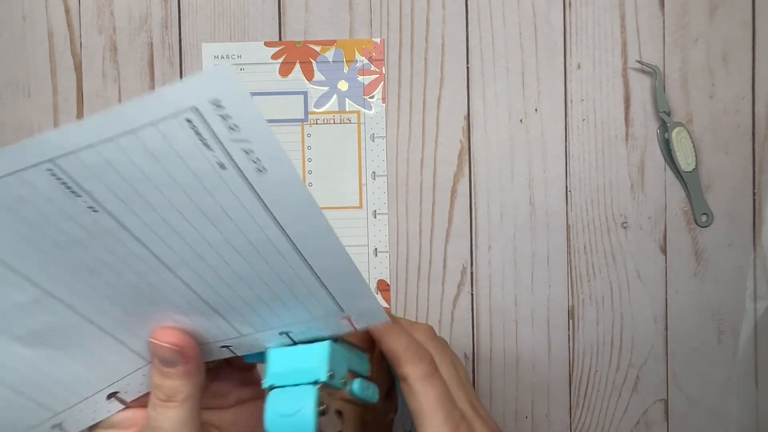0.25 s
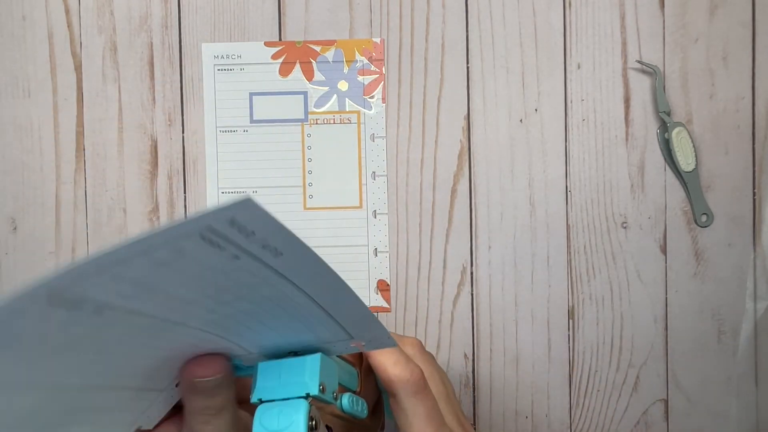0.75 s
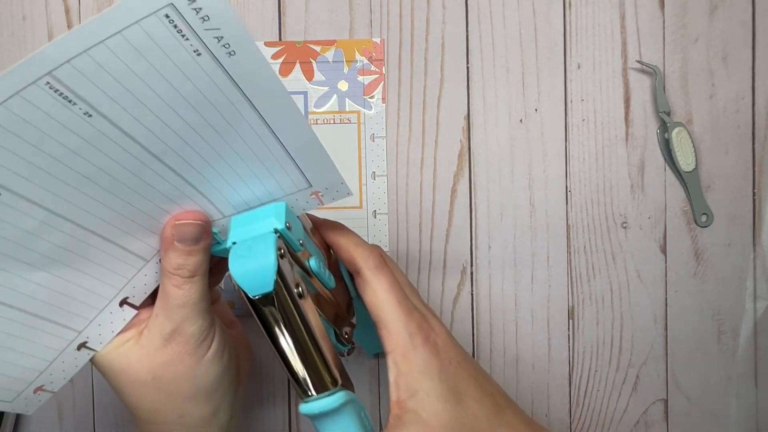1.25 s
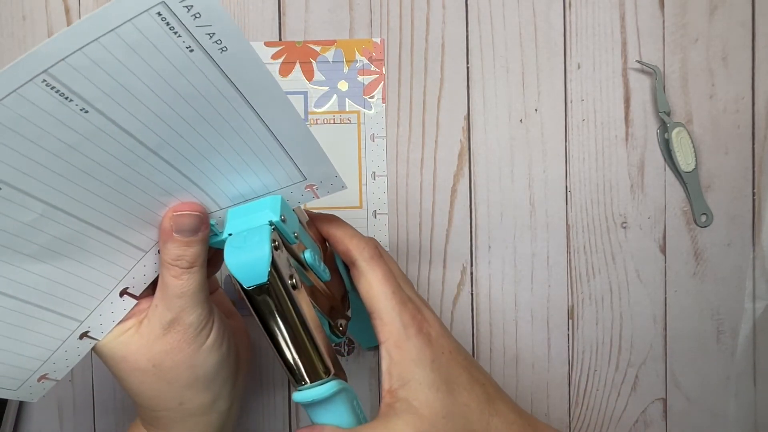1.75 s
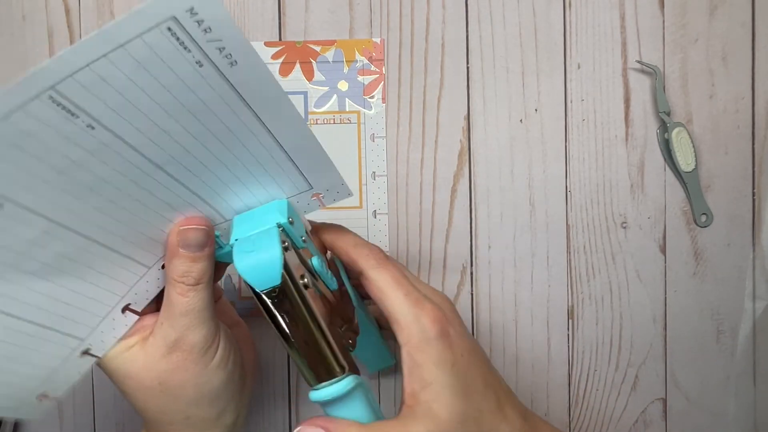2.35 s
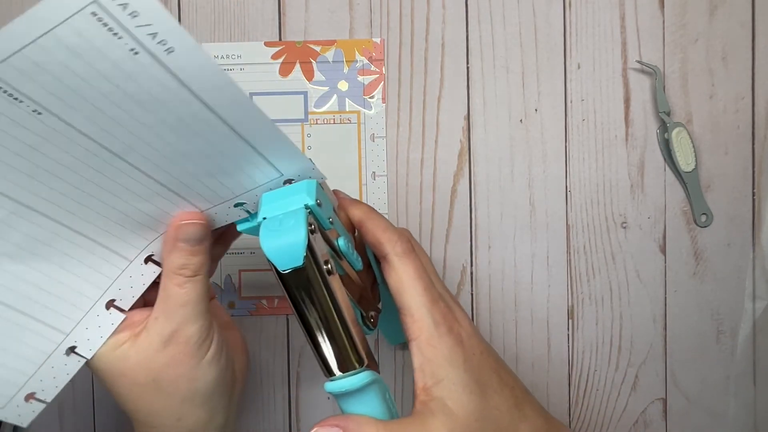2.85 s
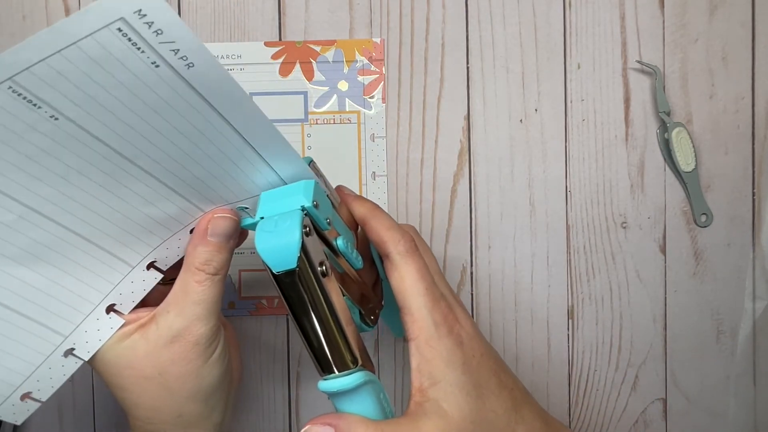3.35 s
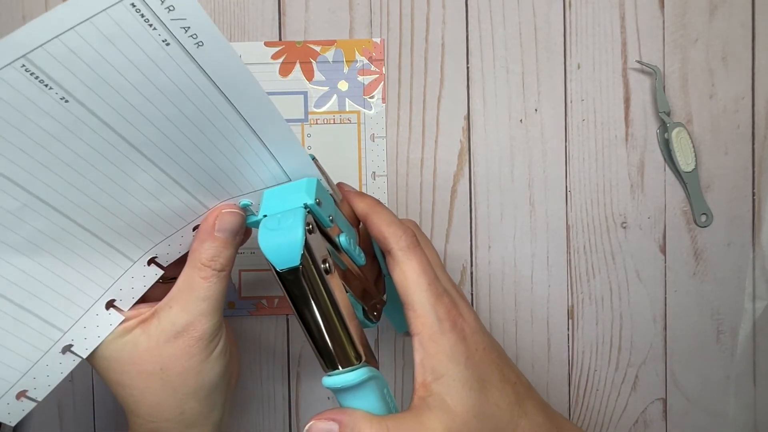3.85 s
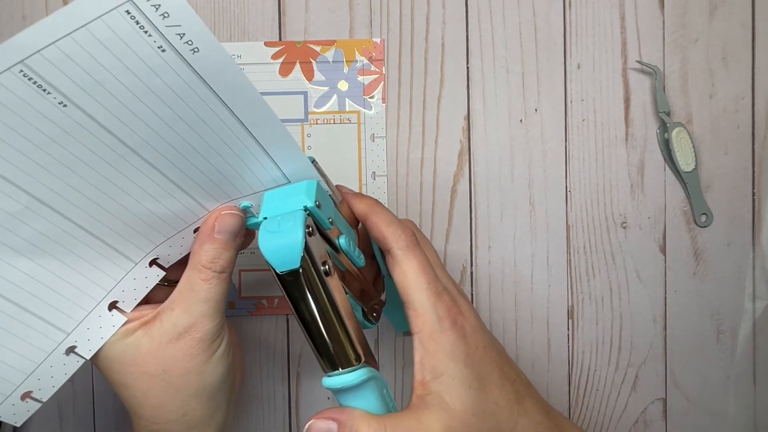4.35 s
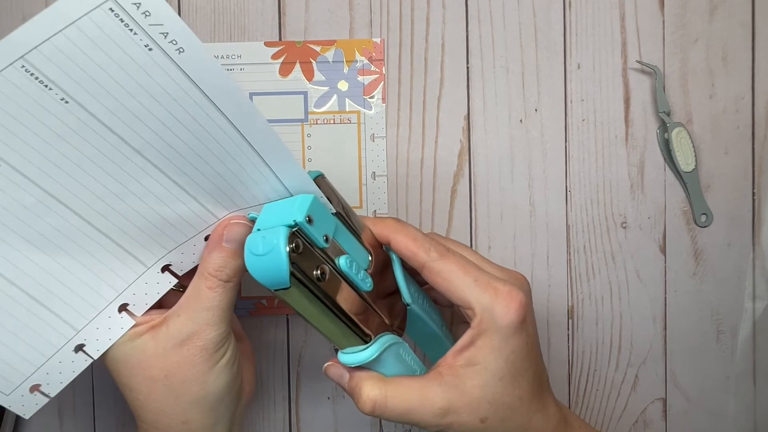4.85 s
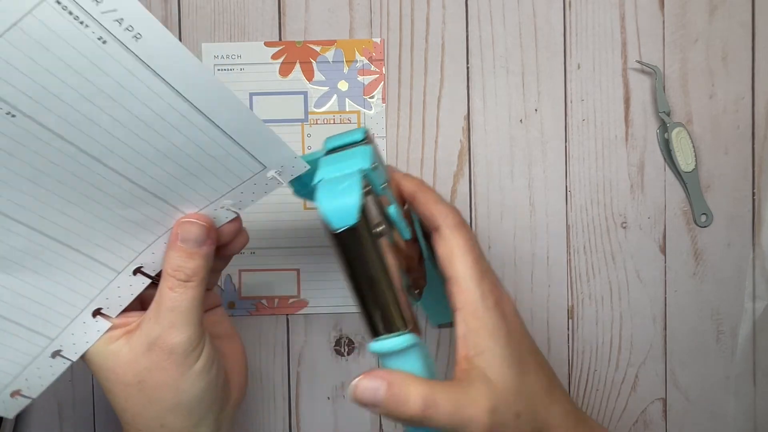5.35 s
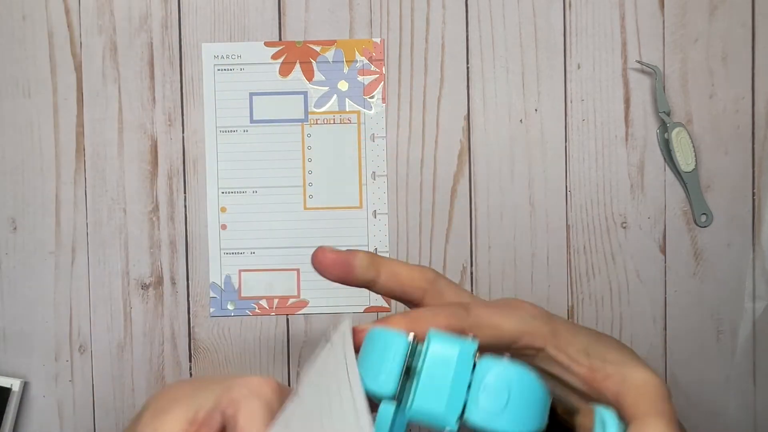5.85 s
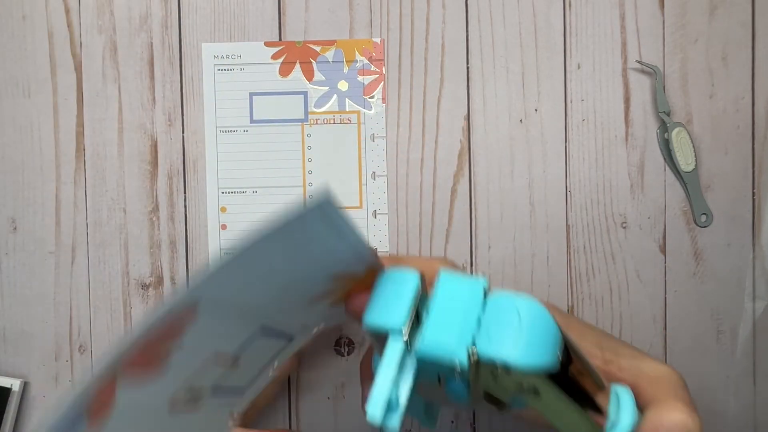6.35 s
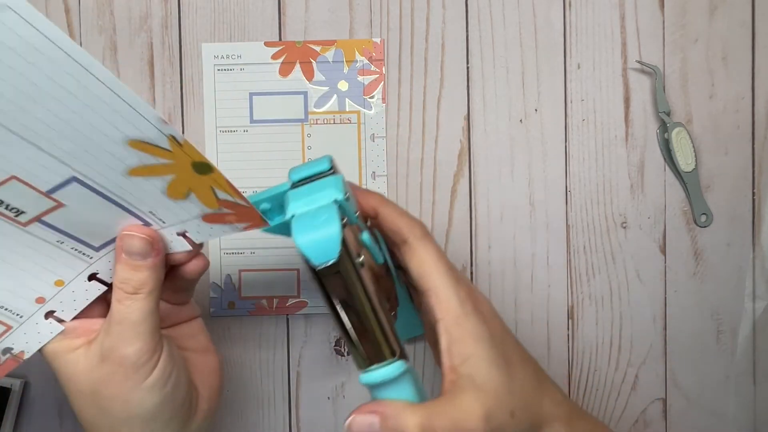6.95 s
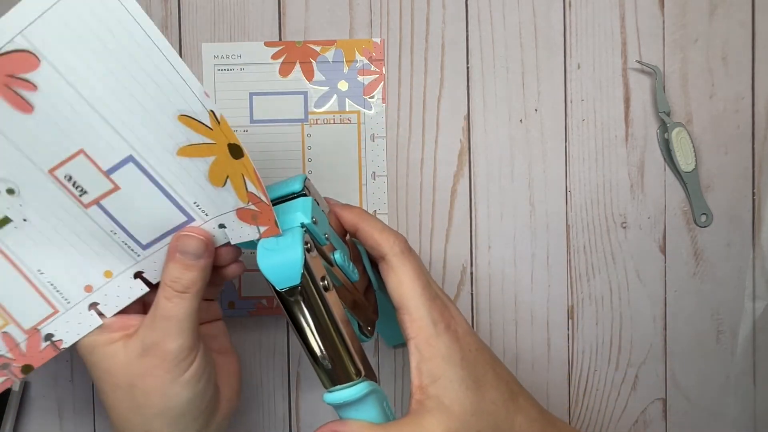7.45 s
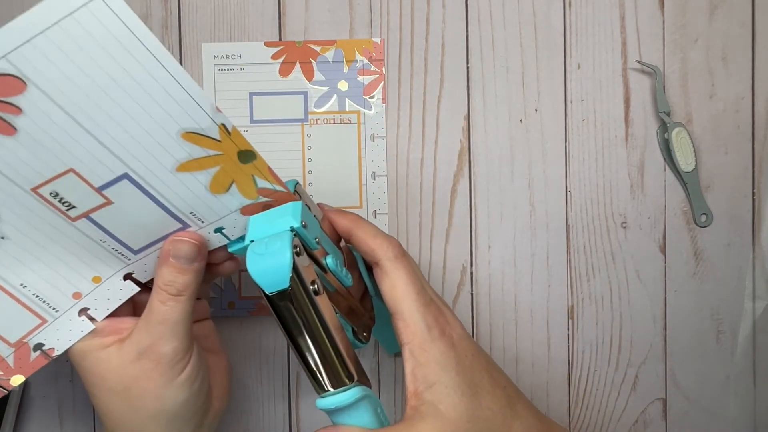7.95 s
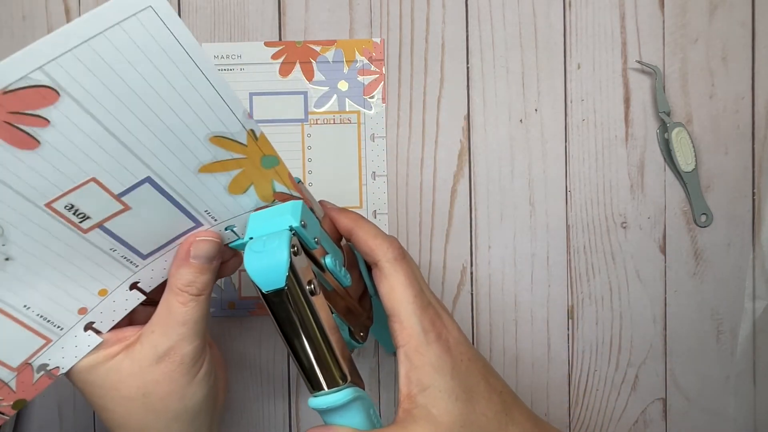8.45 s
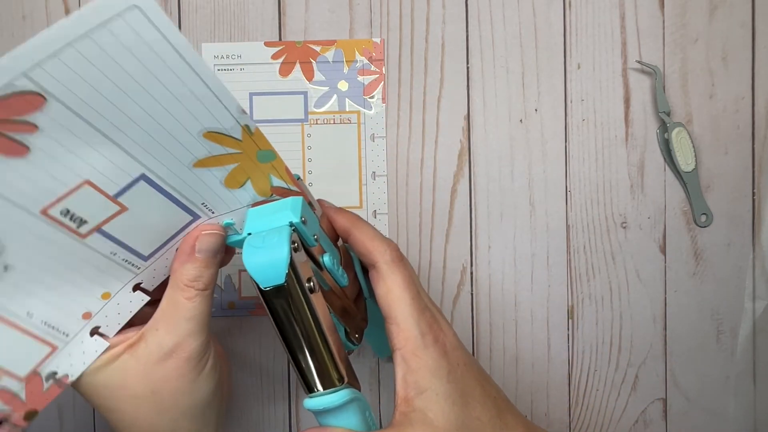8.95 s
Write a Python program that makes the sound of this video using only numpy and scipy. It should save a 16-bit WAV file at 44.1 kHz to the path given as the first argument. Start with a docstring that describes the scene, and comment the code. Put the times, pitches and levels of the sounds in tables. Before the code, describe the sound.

A steady low hum, soft air rumble and barely audible fan whines lie under close, fairly dry desk sounds in a small room. From 0 to 1 second, paper slides lightly with a crisp tick near 0.7. After a pause, a die crunches through paper at 1.95 and snaps sharply at 2.05 with a low thump; release clicks and clacks follow from 2.2 to 2.6, with a stronger paper swish near 2.5. Faint sliding continues, with a small click at 3.43. A second creaking crunch and bright snap come at 4.55-4.65, then clicks and a harsh rasp at 5.1 as the punch opens. Sheets slide and crackle from 5.5, flexing with a hollow wobble and thump around 6.1. A solid plastic knock lands at 6.87, then rustles, a short paper drag at 7.4 and scattered jaw knocks from 8.1 until a sharper one at 9.05.

```python
"""A hand-held lever punch cuts slots in planner pages above a desk, close to a small stereo microphone.
Hum, moving air and faint whines run throughout. First sheets slide and tick; then the die crunches
through paper, snaps home and springs back, sheets slide, and a second cut follows. The die rasps out,
sheets flex and slide, and the plastic jaw knocks as it is lined up. Blows are noise bursts ringing
modes, paper is friction noise and random clicks, low booms and flexes are sines."""
import sys
import numpy as np
from scipy import signal
from scipy.fft import rfft, irfft
from scipy.io import wavfile
from scipy.ndimage import uniform_filter1d

SR = 44100
rng = np.random.default_rng(int(sys.argv[2]) if len(sys.argv) > 2 else 0)


def file_out(sig):
    """Save sig as 16-bit WAV at sys.argv[1]."""
    # one column per channel
    cols = np.atleast_2d(sig).T
    # limit, then scale
    lim = np.clip(cols, -1, 1)
    pcm = np.round(lim * 32767).astype(np.int16)
    wavfile.write(sys.argv[1], SR, pcm)


N = 406161

# Levels are nominal, ahead of room, ports and band limit. Colours and mode strengths are relative.

# Appliance hum. Each row: frequency in Hz, level in dB rms.
HUM_LINES = [(59.6, -59.5), (102.2, -59), (119.9, -47.5)]
# Spectrum of moving air. Each row: frequency in Hz, relative gain in dB.
AIR_COLOUR = [(20, -24.5), (32, -15), (42, 5), (51, -3), (62, -12), (100, 0.5), (152, 6), (175, -2.5),
              (215, -15.5), (330, -18), (720, -19), (1200, -35), (1900, -36), (3200, -48), (6000, -62.5),
              (11000, -56), (13000, -78.5)]
AIR_RMS_DB = -49.5
# Narrow fan hisses. Each row: centre in Hz, half-width in Hz at -6 dB, level in dB rms.
FAN_WHINES = [(2293, 64, -81), (4140, 120, -85.5)]

# Sheet sliding over its neighbour and the fingers.
# Each row: start in seconds, length in seconds, level in dB, edge fizz in dB relative to the level.
STROKES = [(0, 0.2, -61.5, -26), (0.221, 0.072, -48, -31), (0.262, 0.14, -56, -33),
           (0.395, 0.22, -58.5, -15), (0.648, 0.055, -54, -18), (0.716, 0.12, -50, 5),
           (0.843, 0.14, -60.5, -2.5), (2.261, 0.14, -49, -33), (2.476, 0.18, -41, -20),
           (2.642, 0.21, -56, -50), (2.806, 0.23, -48.5, -8.5), (3.098, 0.12, -53.5, -46),
           (3.212, 0.07, -55.5, -35), (3.427, 0.085, -57, -15), (3.564, 0.068, -56.5, -23),
           (5.117, 0.23, -54, -16), (5.528, 0.26, -49, -8), (5.734, 0.19, -54, -33),
           (5.933, 0.061, -45, -5), (6.059, 0.18, -49, -10.5), (6.422, 0.017, -53, 11.5),
           (6.473, 0.13, -44.5, -7.5), (6.605, 0.14, -51, -3), (6.754, 0.16, -48.5, -12),
           (6.92, 0.17, -57.5, -20), (7.103, 0.12, -50.5, -21), (7.372, 0.11, -46, -42),
           (7.58, 0.061, -58, -24), (7.995, 0.27, -52.5, -38), (8.569, 0.31, -54, -31),
           (8.966, 0.065, -51, -20)]
STROKE_SKEW, STROKE_SHARPNESS = 0.62, 1.38  # speed gathers faster than it is lost
SWAY_S, SWAY_DB = 0.26, -11  # motion smeared before and after each stroke
CRINKLE_S, CRINKLE_DB = 0.01, 2  # sheet catches and lets go
HELD_DB = -83  # sheet only held
# Sheet edges catching and creasing.
# Each row: start in seconds, level in dB, fizz in dB relative to the level, decay in seconds.
PAPER_TICKS = [(0.312, -59, -1, 0.012), (0.451, -56, -10, 0.0041), (0.5385, -56.5, 7, 0.004),
               (0.64, -59.5, -16, 0.005), (0.7228, -44, -1.7, 0.0047), (1.2496, -56.5, -6.5, 0.0033),
               (1.16, -65.5, -25, 0.0028), (1.788, -65, -28, 0.0023), (2.813, -53, 4.5, 0.011),
               (3.2535, -51.5, -12, 0.0043), (5.2731, -50.5, -2.5, 0.01), (5.8122, -55.5, 0, 0.0047),
               (5.937, -53, 4, 0.016), (5.994, -56, -22, 0.0032), (6.1725, -51, 5.5, 0.0038),
               (6.427, -51, -5, 0.021), (6.442, -48, -2.5, 0.0071), (6.494, -46.5, -1, 0.02),
               (6.54, -49, -4, 0.0026), (6.777, -48.5, -4, 0.0067), (7.3438, -54, -34, 0.0037),
               (7.4502, -43.5, -0.5, 0.0027), (7.621, -58, 10.5, 0.0054), (7.8297, -57.5, -3.5, 0.0046),
               (8.3814, -50, -2, 0.014), (8.627, -52.5, -10, 0.0013), (8.7269, -49, -6.5, 0.005),
               (8.7426, -50.5, -7.5, 0.0028), (8.8594, -50, -10, 0.027)]
TICK_THUD_DB = 1.5  # low flap, relative to the tick level
# Paper dragged in the slot.
# Each row: start, peak and end in seconds, level in dB, brightness in dB per octave.
PAPER_DRAGS = [(2.308, 2.335, 2.348, -41.5, 0.5), (2.38, 2.415, 2.431, -42.5, -1.5),
               (7.392, 7.42, 7.43, -42.5, -0.5), (7.575, 7.62, 7.635, -47.5, -2)]
# Bent sheet popping over. Each row: start in seconds, level in dB.
SHEET_FLEXES = [(5.756, -52), (5.815, -46), (5.993, -45.5), (6.114, -35), (6.145, -43)]
FLEX_START_HZ = 530
# Spectra of the sheet's face and its edge. Each row: frequency in Hz, relative gain in dB.
PAPER_COLOUR = [(150, 7.5), (350, 5), (720, 11), (1100, -3.5), (1500, 4.5), (2000, 1), (3100, 2.5),
                (4600, 0.5), (6500, -3), (7700, 0), (9300, -10), (10700, 2.5), (12000, -26.5),
                (15000, -53.5)]
EDGE_COLOUR = [(5000, -6.5), (7800, 4), (9200, -8.5), (10600, 12.5), (12000, -2.5), (14000, -35),
               (16000, -57)]
# Free patch of sheet. Each row: frequency in Hz, strength in dB, t60 in seconds.
SHEET_MODES = [(1290, 4, 0.03)]

# Blows of the plastic jaw and handles. Each row: start in seconds, level in dB,
# thud and fizz in dB relative to the level, decay in seconds.
PLASTIC_KNOCKS = [(0.682, -61, 4.5, -20, 0.011), (2.3613, -62.5, 21, 7, 0.034),
                  (2.4119, -45, 8.5, -11, 0.0018), (2.4699, -52.5, 16.5, 19.5, 0.0024),
                  (2.6021, -49.5, 14, -1, 0.0059), (2.6544, -45, 1.5, -28, 0.0097),
                  (3.1533, -56, 18.5, -15, 0.0022), (3.4365, -56.5, 16, -10, 0.011),
                  (3.811, -65, 20, -25.5, 0.00083), (5.1222, -45, 13, -11, 0.0063),
                  (5.5909, -48, 4.5, 0.5, 0.0044), (6.1227, -39, -2.5, -28, 0.0058),
                  (6.856, -45.5, 4, 6, 0.0077), (6.8655, -31, 3, -30, 0.0059),
                  (7.0776, -45.5, 3, 3, 0.0094), (7.1154, -46.5, 6, -25, 0.0027),
                  (7.2284, -51, 19, 7.5, 0.0052), (7.2353, -45.5, 13.5, -13, 0.011),
                  (8.11, -53.5, 16, -4.5, 0.0043), (8.1476, -46, 7, -7.5, 0.0018),
                  (8.3112, -41.5, -1, -8.5, 0.0068), (8.411, -40.5, 3, -12, 0.013),
                  (8.693, -46.5, 2.5, -6, 0.0042), (8.995, -42, 3, -5.5, 0.0035),
                  (9.0505, -51, 5, -1, 0.0027), (9.0526, -36, 7.5, 4, 0.003)]
# Spectrum of the knocks. Each row: frequency in Hz, relative gain in dB.
KNOCK_COLOUR = [(110, -11.5), (220, 5.5), (480, -3), (750, 5), (1050, -2.5), (1600, 0), (3100, -2.5),
                (6500, -17.5), (9300, -16.5), (10700, -10), (12000, -33.5), (15000, -56)]
# Ringing plastic. Each row: frequency in Hz, strength in dB, t60 in seconds.
PLASTIC_MODES = [(417, 5.5, 0.062), (639, 9, 0.033), (785, 4.5, 0.042), (1463, 2.5, 0.018),
                 (2963, -2, 0.042), (5980, -1.5, 0.018)]

# Low booms of desk top (45 Hz) and page held in the jaw (about 200 Hz).
# Each row: start in seconds, pitch in Hz, level in dB.
LOW_BOOMS = [(2.045, 44.85, -36), (2.328, 209, -33.5), (2.469, 189, -37), (4.65, 45, -28.5),
             (6.109, 44.8, -27), (6.866, 204, -31.5), (7.232, 217, -37)]
BOOM_DECAY_S = 0.022
# Surfaces sticking and slipping under pressure.
# Each row: start and end in seconds, pitch in Hz, level in dB.
CREAKS = [(-.1, 0.26, 1600, -66), (4.545, 4.627, 1914, -43)]

# Paper sheared by the die.
# Each row: start, peak and end in seconds, level in dB, brightness in dB per octave.
DIE_CUTS = [(1.926, 1.96, 2.056, -41, -3.5), (4.525, 4.59, 4.67, -43, -3)]
# Sheet clamped in the die. Each row: frequency in Hz, strength in dB, t60 in seconds.
CUT_MODES = [(1900, -3, 0.015)]
CLUMP_DB = 2.8  # unevenness of fibres giving way
# Die and then sheet rasping out of the opening jaw.
# Each row: start, peak and end in seconds, level in dB, brightness in dB per octave.
WITHDRAWALS = [(5.05, 5.109, 5.14, -35.5, -2.5), (5.33, 5.47, 5.53, -55, 1.5)]
# Sharp clicks and snaps of the punch: steel die, lever and spring, and one click of plastic jaw or
# paper guide (3.43 s). Each row: start in seconds, level in dB, thud and fizz in dB relative to the
# level, decay in seconds.
PUNCH_SNAPS = [(2.011, -42, -32.5, 1.5, 0.0008), (2.0299, -42.5, -7, -2.5, 0.002),
               (2.0392, -35, -3, -13, 0.0028), (2.0471, -25, -12.5, -3.5, 0.0013),
               (2.2023, -43.5, -15.5, -3.5, 0.0042), (2.2207, -41.5, -7, -7, 0.0024),
               (2.2482, -46, -13, 2, 0.0018), (2.3283, -30.5, -9.5, -8, 0.0034),
               (2.4643, -35, -12.5, -4, 0.0046), (2.567, -42, -8, 8, 0.002), (3.2738, -51, 2.5, 2, 0.009),
               (3.4298, -37.5, -4, 5, 0.001), (4.559, -36, -10, -7, 0.0017),
               (4.5754, -39, -9.5, -10.5, 0.0023), (4.6179, -40.5, -17.5, 8, 0.002),
               (4.6425, -36, -3, -5, 0.0024), (4.647, -26.5, -4, 6.5, 0.0015),
               (4.9812, -53, 0, -12.5, 0.0038), (4.998, -44.5, -14, -17, 0.014),
               (5.0163, -39.5, -8, 0.5, 0.0013), (5.0334, -48.5, 0, 5, 0.0041), (5.081, -49, 6, 3, 0.002),
               (5.1073, -26, -12, -12, 0.0017), (5.1139, -33, -4.5, 2, 0.0043),
               (5.1886, -49, -2.5, 1, 0.0034), (6.1105, -45, 7, 7.5, 0.0026)]
# Spectrum of snaps, cuts and withdrawals. Each row: frequency in Hz, relative gain in dB.
SNAP_COLOUR = [(120, -8.5), (250, -9.5), (700, -5.5), (1000, -11.5), (1650, -2.5), (2200, -5), (3200, -2),
               (5000, -6), (6700, -6), (9300, -5), (10700, -0.5), (12000, -10), (16000, -52.5)]
# Ringing steel, changed by clamping. Each row: frequency in Hz, strength in dB with the jaws shut,
# strength in dB with the jaws open, t60 in seconds.
STEEL_MODES = [(420, 1.5, -16.5, 0.038), (1205, -0.5, -20, 0.059), (1480, -13.5, -3.5, 0.027),
               (2380, 10.5, -4.5, 0.027), (2940, -6.5, 6, 0.029), (3280, -3.5, 0, 0.055),
               (4260, -13.5, 8.5, 0.02), (5700, -15, 0.5, 0.022), (6070, -13, 0, 0.031),
               (7600, 1, -3.5, .01), (10700, 1.5, -3, 0.005)]
# Handles squeezed shut. Each row: start in seconds, end in seconds.
SQUEEZES = [(1.9, 2.3), (4.5, 5.05)]

# Room decay. Each row: frequency in Hz, t60 in seconds.
ROOM_T60 = [(200, 0.95), (1000, 0.2), (4000, 0.25), (11000, 0.083), (16000, 0.28)]
# Microphone ports. Each row: frequency in Hz, radians by which left leads.
PORT_PHASE = [(130, 0.11), (400, 0.97), (850, 1.4), (1400, 0.87), (3000, 1.27), (3800, 0.72), (4500, 4.37),
              (5700, 5.09), (7000, 7.76), (8600, 8.95), (10000, 10.37), (12500, 12.03)]
# Microphone ports. Each row: frequency in Hz, left minus right in dB.
PORT_BALANCE = [(50, 3), (300, 0.95), (600, 4), (1050, -2), (1600, -1.5), (2300, 0), (3100, 2.5),
                (4000, -7), (5100, 0)]
BAND_EDGE_HZ = 16000


def gain_of(db):
    """Decibels to gain."""
    return 10 ** (np.asarray(db) / 20)


def evened(x):
    """Scales to rms 1."""
    return x / np.sqrt(np.mean(x ** 2) + 1e-30)


def read(points, hz):
    """Reads a table on a log-frequency axis."""
    f, value = np.transpose(points)
    return np.interp(np.log(hz + 1), np.log(f + 1), value)


def freqs(x):
    """Frequency in Hz of each bin of x."""
    return np.fft.rfftfreq(x.shape[-1], 1 / SR)


def filtered(x, gain):
    """Applies a gain per frequency bin."""
    return irfft(rfft(x) * gain, x.shape[-1])


def add(mix, start_s, sound):
    """Mixes a sound in at start_s, or at 0 if that is negative."""
    part = mix[..., max(round(start_s * SR), 0):][..., :sound.shape[-1]]
    part += sound[..., :part.shape[-1]]


def spread(three, apart):
    """Left and right share one excitation; each adds some of its own."""
    return (three[0] + apart * three[1:]) / np.sqrt(1 + apart ** 2)


def stereo_noise(size, apart):
    """White noise, partly shared by left and right."""
    return spread(rng.standard_normal((3, size)), apart)


def smooth_noise(size, width):
    """Slow random curve, rms 1: noise averaged over width samples."""
    return evened(uniform_filter1d(rng.standard_normal(size), size=width))


def causal(gain):
    """Minimum-phase response with this gain: rings only after the blow."""
    log_gain = np.log(np.maximum(gain, 1e-5))
    circle = np.concatenate([log_gain, log_gain[-2:0:-1]])
    return np.exp(np.conj(signal.hilbert(circle)))[:len(gain)]


def body(colour, modes, hz):
    """Gain of an object: broad colour with its modes standing out."""
    peaks = 0
    for mode_hz, db, t60_s in modes:
        offset = (hz - mode_hz) * t60_s * 2 * np.pi / np.log(1000)
        peaks = peaks + gain_of(db) ** 2 / (1 + offset ** 2)
    return gain_of(read(colour, hz)) * np.sqrt(1 + 4 * peaks)


def grains(size, per_s, spread_db, apart):
    """Random clicks of very unequal strength, in stereo, rms 1."""
    clicks = np.zeros((3, size))
    hit = rng.random((3, size)) < per_s / SR
    sign = rng.standard_normal((3, size))[hit]
    strength = rng.exponential(1, (3, size))[hit]
    clicks[hit] = sign * gain_of(spread_db * np.minimum(strength, 4))
    return evened(spread(clicks, apart))


def shifting(x, colour, modes, depth_db):
    """Colours x with peaks and dips that wander over time and frequency as the sheet bends; rms 1."""
    hz, _, z = signal.stft(x, SR, nperseg=512)
    patches = uniform_filter1d(rng.standard_normal(z.shape[1:]), size=6, axis=0)
    patches = evened(uniform_filter1d(patches, size=8, axis=1))
    z = z * body(colour, modes, hz)[:, None] * gain_of(depth_db * patches)
    return evened(signal.istft(z, SR, nperseg=512)[1][:, :N])


def blows(rows, colour, modes, detune, rise_s, thud_lag_s, rattle, rattle_s, apart, size=4096):
    """A brief chatter of contacts rings the object; its low thud builds and dies more slowly."""
    out, t = np.zeros((2, N)), np.arange(size) / SR
    hz = freqs(t)
    low = 1 / (1 + (hz / 1000) ** 8)
    high = 1 / (1 + (4500 / (hz + 1)) ** 8)
    bands = [causal(np.sqrt(share)) for share in (low, np.abs(1 - low - high), high)]
    lead_in_s = .004
    after, before = np.maximum(t - lead_in_s, 0), np.minimum(t - lead_in_s, 0)
    fade_out = np.minimum(1, 2 * (1 - t / t[-1])) ** 2
    for start_s, db, thud_db, fizz_db, decay_s in rows:
        # the changing grip detunes the modes
        grip = np.exp(detune * rng.uniform(-0.92, 1))
        gripped = [(f * grip, mode_db, t60_s) for f, mode_db, t60_s in modes]
        response = causal(body(colour, gripped, hz))
        # the surfaces graze each other just before they meet
        graze = np.exp(before / rise_s)
        crack = graze * (np.exp(-after / decay_s) + rattle * np.exp(-after / rattle_s))
        thud = (1 - np.exp(-after / thud_lag_s)) * np.exp(-after / (decay_s * .5 + thud_lag_s))
        for band, shape, part_db in zip(bands, (thud, crack, crack), (thud_db, 0, fizz_db)):
            contacts = rfft(shape * stereo_noise(size, apart))
            # even out the contacts, so the colour is the object's own
            power = np.mean(abs(contacts) ** 2, axis=0)
            contacts = contacts / np.sqrt(uniform_filter1d(power, size=70))
            ring = evened(irfft(contacts * band * response) * fade_out)
            # level is the rms of the same energy held for 10 ms
            add(out, start_s - lead_in_s, gain_of(db + part_db) * ring * np.sqrt(SR / 100 / size))
    return out


def scrapes(rows, colour, modes, per_s, spread_db, sharpness, size=8192):
    """Fibres catch and break one by one while the pressure builds to its peak and eases."""
    out, t = np.zeros((2, N)), np.arange(size) / SR
    hz = freqs(t)
    for start_s, peak_s, end_s, db, tilt_db in rows:
        arch = np.interp(start_s + t, [start_s, peak_s, end_s], [0, 1, 0])
        # fibres give way in clumps
        clumps = gain_of(CLUMP_DB * smooth_noise(size, 130))
        pressure = np.sin(np.pi / 2 * arch) ** (2 * sharpness) * clumps
        gain = body(colour, modes, hz) * gain_of(tilt_db * np.log2((hz + 200) / 3000))
        breaks = pressure * grains(size, per_s, spread_db, apart=0.53)
        sound = evened(filtered(breaks, causal(gain)))
        # level is the rms over the scrape's own length
        add(out, start_s, gain_of(db) * sound * np.sqrt((end_s - start_s) * SR / size))
    return out


def background():
    """Hum sines over filtered noise: a low rumble of moving air and a fan's faint whines."""
    t = np.arange(N) / SR
    hz = freqs(t)
    sound = gain_of(AIR_RMS_DB) * evened(filtered(stereo_noise(N, 0.097), gain_of(read(AIR_COLOUR, hz))))
    for hum_hz, db in HUM_LINES:
        sound += gain_of(db) * np.sqrt(2) * np.sin(2 * np.pi * (hum_hz * t + rng.random()))
    for whine_hz, width_hz, db in FAN_WHINES:
        resonance = 1 / (1 + ((hz - whine_hz) / width_hz) ** 2)
        sound += gain_of(db) * evened(filtered(rng.standard_normal(N), resonance))
    return sound


def stroke_levels():
    """Leaning, uneven arches of stroke speed: strengths of face friction and edge fizz."""
    levels = np.zeros((2, N))
    for start_s, length_s, db, fizz_db in STROKES:
        progress = np.linspace(0, 1, round(length_s * SR))
        speed = np.abs(np.sin(np.pi * progress ** STROKE_SKEW)) ** STROKE_SHARPNESS
        add(levels, start_s, gain_of([[db], [db + fizz_db]]) * speed)
    sway = uniform_filter1d(levels, round(SWAY_S * SR), axis=1)
    moving = (levels + gain_of(SWAY_DB) * sway) / (1 + gain_of(SWAY_DB))
    return moving * gain_of(CRINKLE_DB * smooth_noise(N, round(CRINKLE_S * SR)))


def sliding():
    """Fine paper friction, sparse crackles, edge fizz, and bumps where fingers shift their grip."""
    level, fizz = stroke_levels()
    hiss = signal.lfilter(*signal.butter(1, 900, "high", fs=SR), stereo_noise(N, 0.1))
    friction = hiss + gain_of(-11.5) * grains(N, per_s=310, spread_db=0.0, apart=0.3)
    sheet = shifting(friction, PAPER_COLOUR, [], depth_db=3.5)
    edge = shifting(friction, EDGE_COLOUR, [], depth_db=5)
    taps = grains(N, per_s=110, spread_db=2.0, apart=0.65)
    bumps = shifting(taps, KNOCK_COLOUR, PLASTIC_MODES, depth_db=2.5)
    held = shifting(hiss, PAPER_COLOUR, [], depth_db=2)
    moving = level * (gain_of(-7.0) * sheet + gain_of(-14.0) * bumps) + fizz * edge
    return moving + gain_of(HELD_DB) * held


def ticking():
    """Sheet edges catch and crease: short blows whose pitch depends on the bend."""
    rows = [(s, db, TICK_THUD_DB, fizz_db, decay_s) for s, db, fizz_db, decay_s in PAPER_TICKS]
    return blows(rows, PAPER_COLOUR, SHEET_MODES, detune=0.26, rise_s=0.00088, thud_lag_s=0.0036,
                 rattle=0.055, rattle_s=0.02, apart=0.25)


def dragging():
    """Paper dragged in the slot: dense fibre clicks in paper colour."""
    return scrapes(PAPER_DRAGS, PAPER_COLOUR, [], per_s=4600, spread_db=3.0, sharpness=0.49)


def flexing(size=4096):
    """A buckling sheet gives a short hollow wobble that rises as it stiffens."""
    out, t = np.zeros(N), np.arange(size) / SR
    for start_s, db in SHEET_FLEXES:
        pitch_hz = FLEX_START_HZ * (1 + 1.4 * t + 0.12 * smooth_noise(size, 120))
        phase = 2 * np.pi * np.cumsum(pitch_hz) / SR
        swell = 1.7 * (1 - np.exp(-t / 0.00077)) * np.exp(-t / 0.02)
        add(out, start_s, gain_of(db) * swell * (np.sin(phase) + 0.44 * np.sin(2 * phase)))
    return out


def knocking():
    """Plastic jaw and handles knock: contact noise rings the plastic modes."""
    return blows(PLASTIC_KNOCKS, KNOCK_COLOUR, PLASTIC_MODES, detune=.06, rise_s=0.00093,
                 thud_lag_s=0.0011, rattle=0.056, rattle_s=0.0037, apart=0.18)


def booming(size=16384):
    """Desk top or page held in the jaw swings briefly: damped sines with a soft onset."""
    out, t = np.zeros(N), np.arange(size) / SR
    for start_s, pitch_hz, db in LOW_BOOMS:
        turns = pitch_hz * t
        swell = (1 - np.exp(-turns / 0.32)) * np.exp(-t / BOOM_DECAY_S)
        add(out, start_s, gain_of(db) * np.sin(2 * np.pi * turns) * swell)
    return out


def creaking(size=22050):
    """Stick-slip as narrow-band noise: a fuzzy tone that swells and fades."""
    out, t = np.zeros(N), np.arange(size) / SR
    for start_s, end_s, pitch_hz, db in CREAKS:
        resonance = 1 / (1 + ((freqs(t) - pitch_hz) / 150) ** 2)
        tone = evened(filtered(rng.standard_normal(size), resonance))
        # a negative start enters partway through the swell
        elapsed_s = t + max(start_s, 0) - start_s
        swell = np.sin(np.pi * np.clip(elapsed_s / (end_s - start_s), 0, 1))
        add(out, start_s, gain_of(db) * tone * swell)
    return out


def cutting():
    """The die shears the sheet with a dense, dry crunch."""
    return scrapes(DIE_CUTS, SNAP_COLOUR, CUT_MODES, per_s=2900, spread_db=2.5, sharpness=0.71)


def withdrawing(open_modes):
    """Die and then sheet rasp out of the opening jaw: fibre clicks ring the open-jaw modes."""
    return scrapes(WITHDRAWALS, SNAP_COLOUR, open_modes, per_s=1800, spread_db=3.0, sharpness=1.7)


def punching():
    """Sharp clicks and snaps ring shut-jaw modes during a squeeze, open-jaw modes otherwise; plus rasps."""
    shut_modes = [(hz, db, t60_s) for hz, db, _, t60_s in STEEL_MODES]
    open_modes = [(hz, db, t60_s) for hz, _, db, t60_s in STEEL_MODES]
    out = withdrawing(open_modes)
    for shut, modes in ((True, shut_modes), (False, open_modes)):
        snaps = [row for row in PUNCH_SNAPS if any(a < row[0] < b for a, b in SQUEEZES) == shut]
        out += blows(snaps, SNAP_COLOUR, modes, detune=0.022, rise_s=0.00028, thud_lag_s=0.003,
                     rattle=0.25, rattle_s=0.0068, apart=0.066)
    return out


def room(x, size=16384):
    """A small furnished room: a diffuse tail, each band dying at its own speed."""
    hz, t, z = signal.stft(stereo_noise(size, 1.0), SR, nperseg=256)
    decay = gain_of(-60 * t / read(ROOM_T60, hz)[:, None])
    tail = signal.istft(z * decay, SR, nperseg=256)[1]
    # silent for 5.8 ms, then fades in over as long
    tail = tail * np.clip(np.arange(tail.shape[1]) / SR / 0.0058 - 1, 0, 1)
    return signal.oaconvolve(x, tail / np.linalg.norm(tail[0]), axes=1)[:, :N]


def ports(x):
    """The two microphone ports hear with different phase and strength."""
    hz = freqs(x)
    lead_rad = np.interp(hz, *np.transpose([(0, 0)] + PORT_PHASE))
    lean = gain_of(read(PORT_BALANCE, hz))
    pair = np.array([lean * np.exp(.5j * lead_rad), np.exp(-.5j * lead_rad)])
    return filtered(x, pair / np.sqrt((1 + lean ** 2) / 2))


def scene():
    """Punch and paper over the desk, their reverberation, and the background."""
    paper = sliding() + ticking() + dragging() + flexing()
    punch = knocking() + booming() + creaking() + cutting() + punching()
    near = paper + punch
    return ports(background() + near + gain_of(-20.0) * room(near))


def record(dry):
    """The recorder's band limit: a linear-phase low-pass."""
    lowpass = signal.firwin(511, BAND_EDGE_HZ, window=("kaiser", 9), fs=SR)
    return signal.oaconvolve(dry, lowpass[None], "same")


dry = scene()
out = record(dry)
file_out(out)
```